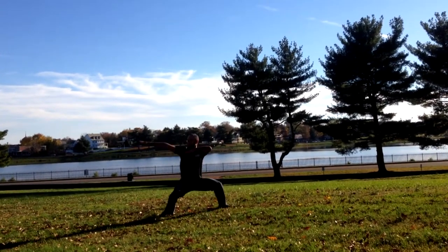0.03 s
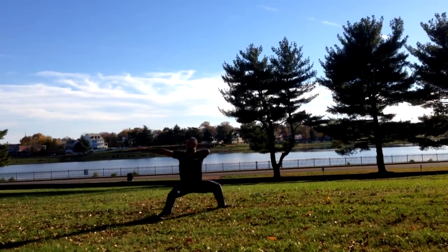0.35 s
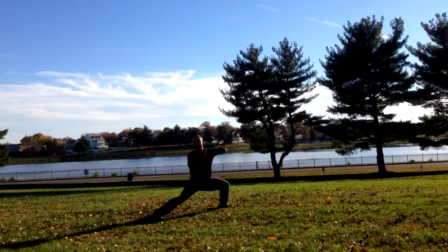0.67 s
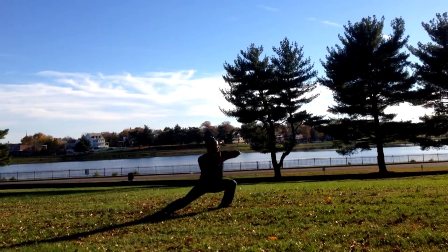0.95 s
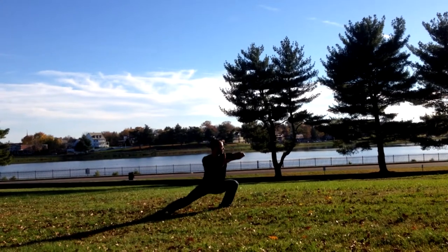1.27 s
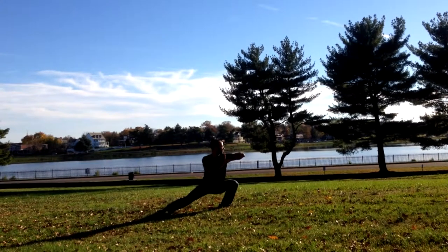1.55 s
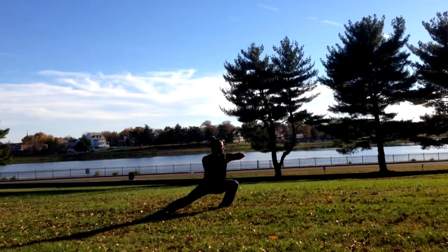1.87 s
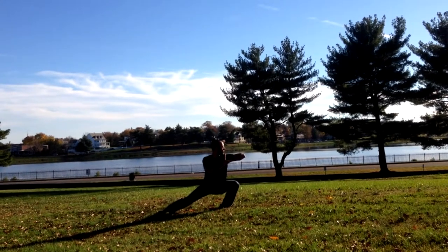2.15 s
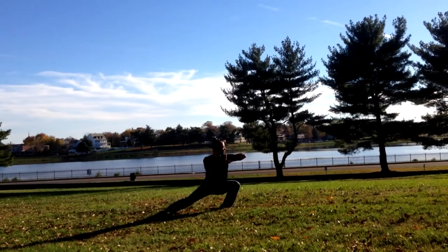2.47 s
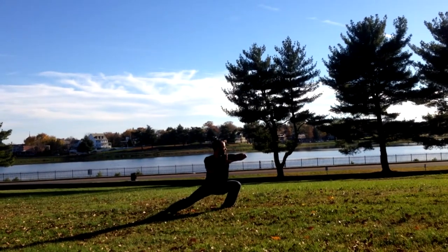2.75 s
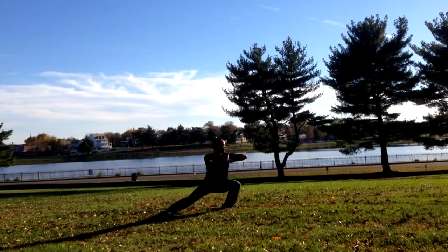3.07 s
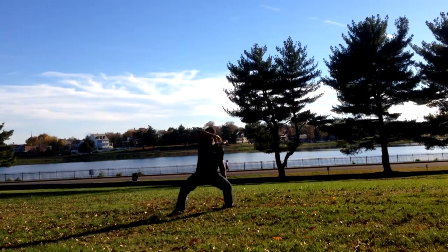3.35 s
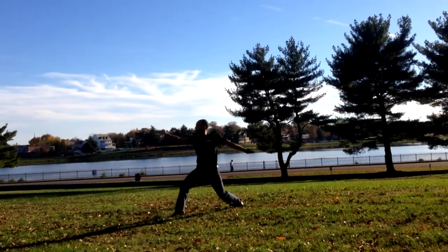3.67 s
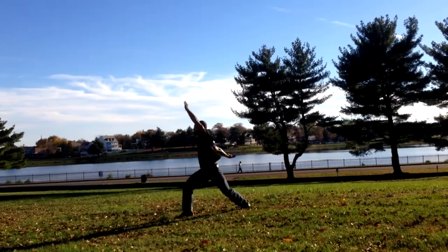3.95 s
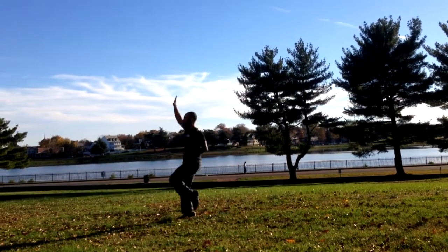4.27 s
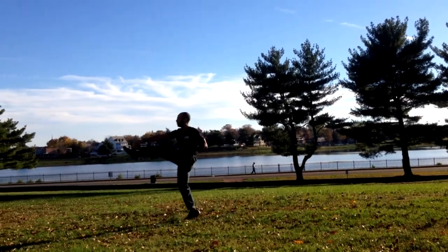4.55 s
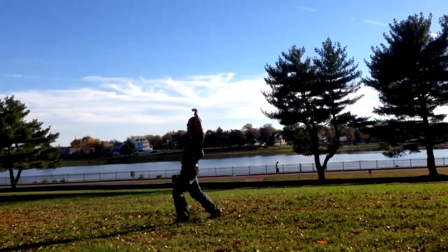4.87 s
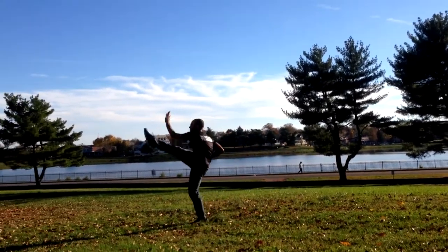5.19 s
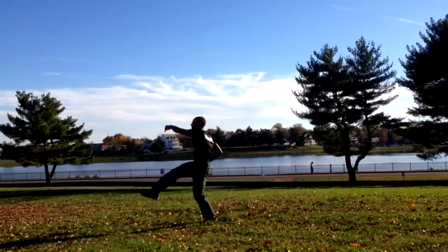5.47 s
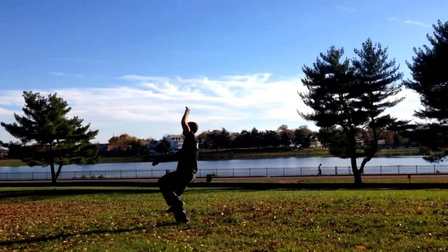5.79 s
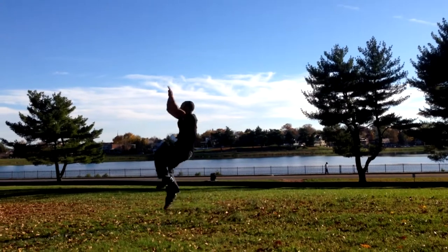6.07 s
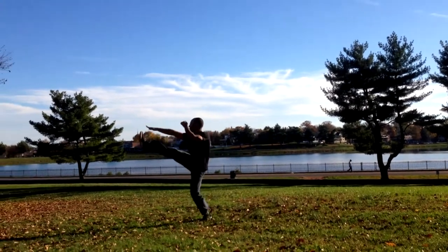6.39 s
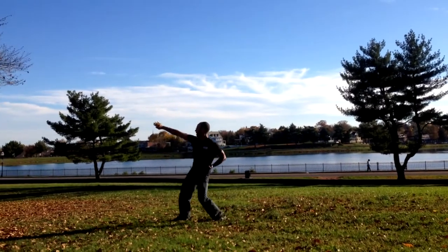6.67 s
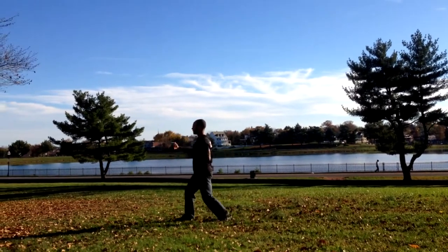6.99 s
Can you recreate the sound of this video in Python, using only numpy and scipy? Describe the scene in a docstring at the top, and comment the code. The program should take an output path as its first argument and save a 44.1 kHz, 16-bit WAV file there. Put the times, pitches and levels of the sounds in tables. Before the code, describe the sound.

A low, steady rumble of distant traffic with a faint hiss fills an open park, and far engines drone softly by turns, most noticeably in the first three seconds. At about 0.8 seconds a sharp, hollow clap of the hands pops near the microphone. From around 3.3 seconds, clothes swish faintly and feet brush through grass and dry leaves. A louder slap of palm on leg or shoe cracks at 4.5 seconds, followed by light crackling steps near 5 seconds and another loud slap at 5.3. Two more come in quick succession at 6.1 and 6.4 seconds, the first bright and flat, the second fuller. Each slap is short, stands well above the background and leaves a faint echo from the trees. At about 6.7 seconds a foot lands on the turf with a soft thud, and a brief swish and leaf snap follow near 7 seconds.

```python
"""A lawn in an open park, the microphone near a martial arts routine, trees and town farther off.
Distant traffic rumbles and hisses, and far engines drone by turns. Close by, clothes swish, feet
brush through grass and dry leaves, and the last kick lands on the turf with a soft thud.
In front, five sharp slaps of a palm on hand, leg and shoe: each squeezes out a pocket of air
with a pop, the ground bounces it to the microphone, and the trees scatter a faint echo."""
import sys
import numpy as np
from scipy import signal
from scipy.fft import rfft, irfft, next_fast_len
from scipy.io import wavfile
from scipy.ndimage import uniform_filter1d, map_coordinates

SR = 44100
rng = np.random.default_rng(int(sys.argv[2]) if len(sys.argv) > 2 else 0)


def master(y):
    """Save y as 16-bit WAV."""
    cut = np.clip(np.atleast_2d(y).T, -1, 1)
    pcm = np.round(cut * 32767)  # scale
    wavfile.write(sys.argv[1], SR, pcm.astype(np.int16))


N = 314433


def amp(db):
    """Decibels to gain."""
    return np.exp(np.asarray(db) * np.log(10) / 20)


def unit(x):
    """Scale to rms 1."""
    return x / np.sqrt(np.mean(x ** 2) + 1e-20)


def along(points, hz):
    """Read (f/Hz, value) points on a log frequency axis."""
    f, values = np.transpose(points)
    return np.interp(np.log(hz + 1), np.log(f + 1), values)


def wobble(rate, size=N):
    """A smooth random curve, rate knots a second."""
    knots = rng.standard_normal(int(size * rate / SR) + 4)
    fine = np.arange(4 * len(knots) - 4) / 4
    return np.interp(np.arange(size) * rate / SR, fine, map_coordinates(knots, [fine]))


def filtered(x, response):
    """Filter x by a complex response of frequency."""
    size = next_fast_len(len(x) + 8192)
    return irfft(rfft(x, size) * response(np.fft.rfftfreq(size, 1 / SR)), size)[:len(x)]


def coloured(x, spectrum):
    """x given a spectrum, at rms 1."""
    return unit(filtered(x, lambda hz: amp(along(spectrum, hz))))


def swell(t, rise, t60):
    """An envelope that grows up to t = 0 and then falls 60 dB in t60 seconds."""
    return np.exp(np.maximum(np.where(t < 0, t / rise, -np.log(1000) * t / t60), -40))


def bell(t, width):
    """A smooth hump around t = 0, down to 1 / e at t = width."""
    return np.exp(-np.minimum((t / width) ** 2, 40))


def outside(t, start, length):
    """Time before (negative) or after (positive) a stretch; 0 within it."""
    return t - np.clip(t, start, start + length)


def scattered(x, grain_db):
    """x broken into uneven wavelets, energy 1."""
    x = x * amp(grain_db * wobble(302, size=len(x)))
    return x / np.linalg.norm(x)


def burst(t, rise, t60, grain_db):
    """A short swell of grainy noise, energy 1."""
    return scattered(rng.standard_normal(len(t)) * swell(t, rise, t60), grain_db)


def patchy(depth_db):
    """White noise whose bands swell and sink apart, as far sound does in moving air."""
    bands = signal.stft(rng.standard_normal(N), nperseg=1024)[2]
    drift = uniform_filter1d(rng.standard_normal(bands.shape), size=6, axis=0)
    drift = unit(uniform_filter1d(drift, size=12, axis=1))
    low_weight = 1 / (1 + np.fft.rfftfreq(1024, 1 / SR)[:, None] / 5000)
    return signal.istft(bands * amp(depth_db * low_weight * drift), nperseg=1024)[1][:N]


# Road rumble as it reaches the lawn: t/s, level/dB
RUMBLE_LEVELS = [(0, -49.5), (2.4, -50.5), (3.1, -52), (4.3, -52.5), (6.1, -51.5), (7.13, -54)]
# Spectra of the far rumble and of the tyre hiss: f/Hz, level/dB
RUMBLE_SPECTRUM = [(13, -60), (22, -36), (48, -8), (85, -3), (108, -3.5), (119, -1), (131, -5.5), (150, -4),
                   (193, -6), (265, -15), (305, -19), (380, -30), (461, -45), (600, -41.5), (780, -65.5),
                   (1320, -120)]
TYRE_SPECTRUM = [(240, -23), (400, -1.5), (466, -2.5), (569, -6), (809, -2.5), (1080, -4.5), (1490, -4),
                 (2150, -11), (3970, -10.5), (6680, -12), (12700, -13), (14600, -15), (15500, -15)]


def traffic(tyre_db=-63):
    """Roads far beyond the park: a low rumble that slowly ebbs, and a steady wash of tyres and air."""
    times, levels = np.transpose(RUMBLE_LEVELS)
    rumble_db = np.interp(np.arange(N) / SR, times, levels) + 1.2 * wobble(8)
    rumble = amp(rumble_db) * coloured(rng.standard_normal(N), RUMBLE_SPECTRUM)
    return rumble + amp(tyre_db) * coloured(patchy(depth_db=1.5), TYRE_SPECTRUM)


# Engine drones in the distance: t/s, hold/s, f/Hz, level/dB
DRONES = [(0, 1.87, 124, -51.5), (2.247, 0.32, 119.5, -53), (4.65, 0.16, 115, -57),
          (5.75, 0.46, 121, -56.5)]


def engines(fade_s=0.19, waver_hz=2.25, waver_db=1.7):
    """Each far engine swells out of the rumble, holds one wavering note and sinks away."""
    t = np.arange(N) / SR
    out = np.zeros(N)
    for start, hold, hz, db in DRONES:
        pitch = hz + waver_hz * wobble(14)
        note = np.sqrt(2) * np.sin(2 * np.pi * np.cumsum(pitch) / SR)
        out += amp(db) * bell(outside(t, start, hold), fade_s) * note
    return out * amp(waver_db * wobble(7.2))


# A foot presses into grass and leaves: t/s, level/dB, time under load/s
STEPS = [(3.371, -59, 0.013), (3.946, -58.8, 0.053), (4.858, -52.7, 0.027), (5.033, -51, 0.0042),
         (5.64, -58, 0.026), (6.669, -46.5, 0.03)]
# Single snaps of a dry leaf or of cloth: t/s, level/dB, t60/s
SNAPS = [(4.919, -52, 0.039), (5.07, -54, .025), (5.1094, -46, 0.011), (5.785, -56, 0.045),
         (6.324, -45, .028), (7.0728, -42, .008)]
# Sleeves and trousers sweep by: top speed at t/s, level/dB, length/s
SWISHES = [(0.015, -66, 0.22), (.58, -72.5, 0.099), (3.293, -63, 0.26), (3.575, -66, 0.18),
           (3.77, -65, .08), (3.944, -61.5, .12), (4.17, -69, .25), (4.8, -72, 1), (5.746, -68.5, 0.28),
           (6.048, -66, 0.077), (6.36, -55, 0.041), (6.757, -57, 0.057), (7.045, -58.5, 0.17)]
# Spectra of grass under a sole, and of dry leaves and cloth: f/Hz, level/dB
GRASS_SPECTRUM = [(250, -30), (600, -21), (1000, -16), (2000, -8), (2700, -9), (3600, -4), (5500, -0.5),
                  (7500, -5), (10000, -8.5), (15500, -20)]
CRISP_SPECTRUM = [(600, -47), (1000, -15.5), (2000, -6), (2700, -11), (3600, -3), (5500, -3.5), (7500, -5),
                  (10000, -9), (13000, -9.5), (15500, -12)]


def rustle(step_rise_s=0.0022, stamp_db=-48.5, cracks_per_s=980, crack_db=-7.5, cloth_rest_db=-82):
    """Near the microphone, grass and leaves crackle underfoot and clothes swish as the limbs sweep."""
    def grains(spectrum, depth_db, rate):
        return coloured(rng.standard_normal(N) * amp(depth_db * wobble(rate)), spectrum)

    t = np.arange(N) / SR
    # leaves crush quickly and spring back slowly; steps softer than a stamp take longer to rise
    press = sum(amp(db) * swell(outside(t, s, load), step_rise_s * amp(stamp_db - db), t60=0.13)
                for s, db, load in STEPS)
    snap = sum(amp(db) * swell(t - s, rise=0.00031, t60=t60) for s, db, t60 in SNAPS)
    # the clothes never hang quite still
    sweep = amp(cloth_rest_db) + sum(amp(db) * bell(t - s, length / 2) for s, db, length in SWISHES)
    cracks = coloured(rng.standard_normal(N) * (rng.random(N) < cracks_per_s / SR), CRISP_SPECTRUM)
    steps = press * (grains(GRASS_SPECTRUM, depth_db=4, rate=1400) + amp(crack_db) * cracks)
    snaps = snap * grains(CRISP_SPECTRUM, depth_db=5, rate=2000)
    cloth = sweep * grains(CRISP_SPECTRUM, depth_db=2.5, rate=200)
    return steps + snaps + cloth


# Heel and sole meet the lawn: t/s, level/dB
FOOTFALLS = [(5.701, -9), (6.68, 3.5), (6.695, 5), (6.712, 9), (6.732, 2.5)]
# Damped resonances of the turf: f/Hz, width/Hz, level/dB
TURF_MODES = [(137, 75, 3), (418.3, 16.4, 2), (577, 61, -19)]


def landing(soft_hz=650):
    """The foot comes down nearby in a few soft blows on damped turf."""
    def turf(hz):
        modes = sum(amp(db) * 1j * hz * width / (centre ** 2 - hz ** 2 + 1j * hz * width)
                    for centre, width, db in TURF_MODES)
        return modes / (1 + (hz / soft_hz) ** 4)

    blows = np.zeros(N)
    for s, db in FOOTFALLS:
        blows[round(s * SR)] = amp(db)
    return filtered(blows, turf)


# Decay of the echo from the surrounding trees: f/Hz, t60/s
TREE_DECAY = [(200, 1), (1500, 0.83), (4000, 0.91), (12000, 0.98)]


def tree_echo(build_s=0.014):
    """Thin scatter from the trees, energy 1; it takes a moment to build at the microphone."""
    hz, t, bands = signal.stft(rng.standard_normal(SR // 2), SR, nperseg=256)
    envelope = amp(-60 * t / along(TREE_DECAY, hz)[:, None]) * (1 - np.exp(-t / build_s))
    tail = signal.istft(bands * envelope, SR, nperseg=256)[1][:SR // 2]
    return scattered(tail, grain_db=4)


# Distinct returns from trunks across the lawn: delay/s, level/dB
TRUNK_ECHOES = [(.139, -33), (0.155, -36)]
SCATTER_HZ = 500  # grass and trees throw back little below this


def paths(hz, bounce_s, bounce_db, aim_db, bounce_hz=9000, trunk_hz=2200):
    """Response from palm to microphone: the straight path, then duller copies off ground and trunks."""
    ground = amp(bounce_db) * np.exp(-2j * np.pi * hz * bounce_s) / (1 + 1j * hz / bounce_hz)
    trunks = sum(amp(db + aim_db) * np.exp(-2j * np.pi * hz * delay) for delay, db in TRUNK_ECHOES)
    trunk_colour = hz / (hz + SCATTER_HZ) / (1 + 1j * hz / trunk_hz) ** 2
    return 1 + ground + trunks * trunk_colour


def pop(spectrum, peaks, size=4096):
    """The pressure pulse of air squeezed from under a palm, energy 1."""
    hz = np.fft.rfftfreq(size, 1 / SR)
    peaks_db = sum(boost / (1 + (2 * (hz - centre) / width) ** 2) for centre, width, boost in peaks)
    cepstrum = irfft(np.log(amp(along(spectrum, hz) + peaks_db) + 1e-6))
    # minimum phase: nothing sounds before the strike
    cepstrum[1:size // 2] *= 2
    cepstrum[size // 2 + 1:] = 0
    pulse = irfft(np.exp(rfft(cepstrum)))
    return pulse / np.linalg.norm(pulse)


# Each strike traps a different pocket of air, with its own spectrum: f/Hz, level/dB
CUPPED_PALM = [(30, -59), (80, -36), (280, -14.5), (900, -11.5), (1350, 0), (2000, -6), (2900, -10),
               (4400, -12), (5500, -6), (7000, -20), (10000, -14.5), (13000, -24), (15500, -23)]
FIRST_KICK = [(30, -44.5), (70, -32), (150, -5.5), (350, -8.5), (750, -4), (1800, -19), (3800, -7),
              (4500, -17.5), (7000, -17.5), (11000, -21.5), (15500, -45)]
SECOND_KICK = [(30, -35), (60, -20), (130, 1), (250, 4), (400, -8.5), (900, -3.5), (1900, -13), (2900, -26),
               (4500, -25), (6000, -26.5), (9000, -27), (15500, -49.5)]
FLAT_PALM = [(30, -59.5), (80, -22), (220, -2), (350, -16), (700, -2), (1700, -9.5), (2480, -12.5),
             (2900, 0), (5500, -0.5), (8500, -9), (11000, -4), (13500, -9.5), (15500, -23)]
LAST_KICK = [(30, -47), (70, -17), (190, 1), (270, 0.5), (420, -3.5), (900, 0), (1600, -2.5), (2100, -3),
             (2700, -9.5), (4000, -17), (6500, -17), (9500, -17), (11500, -25.5), (15500, -34)]
# Peaks that give each slap its hollow, ringing colour: f/Hz, width/Hz, boost/dB
CUPPED_PEAKS = [(1520, 420, 1), (2240, 220, 10.5), (3700, 370, 10), (4900, 247, 4), (8020, 350, 8)]
FIRST_PEAKS = [(263, 57, 8.1), (730, 460, 12.5), (1456, 340, 15.3), (2070, 380, 14), (2740, 210, 11.7),
               (3630, 610, 8.9), (6560, 360, 14)]
SECOND_PEAKS = [(179, 140, 4), (1420, 130, 7.5), (2440, 600, 18), (3440, 620, 21.4), (4670, 400, 14.4)]
FLAT_PEAKS = [(1670, 480, 9.1), (3250, 190, 8.6), (3900, 610, 8.2), (5000, 290, 6.5), (6100, 800, 4)]
LAST_PEAKS = [(194, 84, 5.9), (680, 340, 11.3), (1950, 393, 3.2), (3380, 660, 19.2), (4810, 400, 19.2),
              (5950, 340, 17)]
# Palm strikes in front of the microphone: t/s, level/dB, ground bounce delay/ms, bounce/dB,
# finger touch lead/ms, touch/dB, flutter/dB, limb thud/dB, aim towards the trees/dB
SLAPS = [(0.7507, 1.5, 0.56, -8.5, 0.23, -13, -13, -24, -1),
         (4.523, 6.5, 0.76, -11.5, 0.57, -9, -10.5, -9.5, -1.5),
         (5.3056, 6.5, 0.97, -23, 1.45, -7, -10, -11.5, 0.5),
         (6.1381, 4.7, 1.036, -12, 0.33, -16, -12.5, -23, 1.3),
         (6.3717, 7.5, 0.897, -6, 1.6, -6, -13.5, -15.5, -3)]


def slaps(closing_hz=4500, thud_hz=420, touch_hz=2500, lawn_db=-18, trees_db=-26, peak_share=0.48):
    """In the foreground, fingers touch first, then the palm pops; lawn and trees scatter a faint tail."""
    def closing(hz):
        """The palm does not close all at once: its pulse is smeared by a fraction of a millisecond."""
        return ((closing_hz - 1j * hz) / (closing_hz + 1j * hz)) ** 3

    out = np.zeros(N)
    lead = SR // 100
    t = (np.arange(SR // 2) - lead) / SR
    impact = 1.0 * (t == 0)
    hands = [(CUPPED_PALM, CUPPED_PEAKS), (FIRST_KICK, FIRST_PEAKS), (SECOND_KICK, SECOND_PEAKS),
             (FLAT_PALM, FLAT_PEAKS), (LAST_KICK, LAST_PEAKS)]
    for strike, (spectrum, peaks) in zip(SLAPS, hands):
        s, db, bounce_ms, bounce_db, touch_ms, touch_db, flutter_db, thud_db, aim_db = strike
        arrivals = filtered(impact, lambda hz: closing(hz) * paths(hz, bounce_ms / 1000, bounce_db, aim_db))
        # skin and cloth flutter once the palm has closed, and the struck limb shudders
        flutter = amp(flutter_db) * burst(t - 0.0015, rise=0.00031, t60=0.015, grain_db=5)
        thud = amp(thud_db) * burst(t - 0.005, rise=0.0019, t60=0.028, grain_db=4.5)
        thud = filtered(thud, lambda hz: 1 / (1 + 1j * hz / thud_hz))
        # fingertips are small: only treble
        touch = amp(touch_db) * burst(t + touch_ms / 1000, rise=0.00035, t60=0.0034, grain_db=0)
        touch = filtered(touch, lambda hz: hz ** 2 / (hz ** 2 + touch_hz ** 2))
        tail = amp(lawn_db) * burst(t - 0.003, rise=0.0099, t60=0.076, grain_db=2.5)
        tail[lead:] += amp(trees_db + aim_db) * tree_echo()[:-lead]
        tail = filtered(tail, lambda hz: hz ** 2 / (hz ** 2 + SCATTER_HZ ** 2))
        # only the pop itself has the full hollow colour
        soft_peaks = [(hz, 2 * width, boost * peak_share) for hz, width, boost in peaks]
        smack = signal.fftconvolve(arrivals, pop(spectrum, peaks))
        smack += signal.fftconvolve(touch + flutter + thud + tail, pop(spectrum, soft_peaks))
        start = round(s * SR) - lead
        out[start:start + len(smack)] += amp(db) * smack[:N - start]
    return out


def scene():
    """The routine close by and the town far behind it, in mono from one spot on the lawn."""
    return (slaps() + rustle() + landing() + traffic() + engines())[None]


def record(dry, top_hz=15450):
    """The microphone's channel keeps nothing above its band limit."""
    return np.array([filtered(channel, lambda hz: 1 / np.sqrt(1 + (hz / top_hz) ** 240))
                     for channel in dry])


dry = scene()
out = record(dry)
master(out)
```